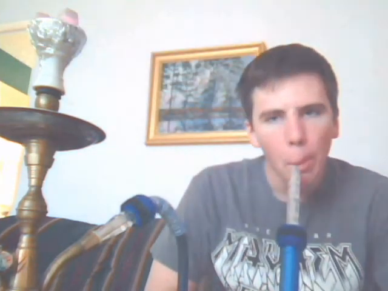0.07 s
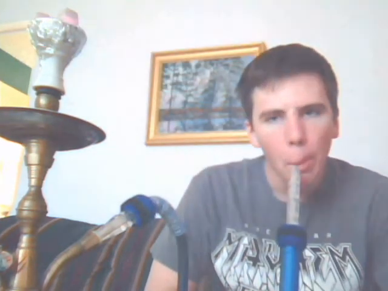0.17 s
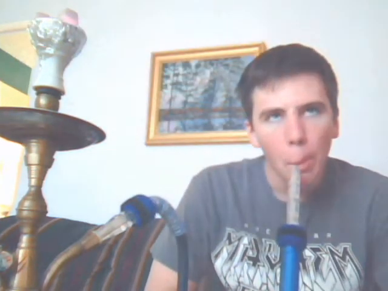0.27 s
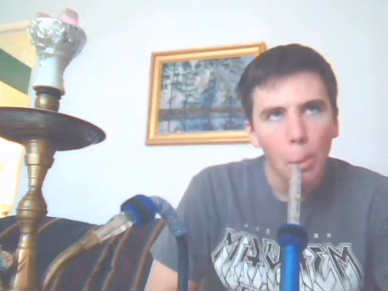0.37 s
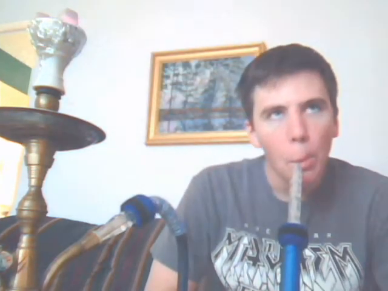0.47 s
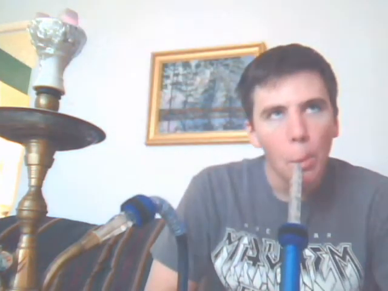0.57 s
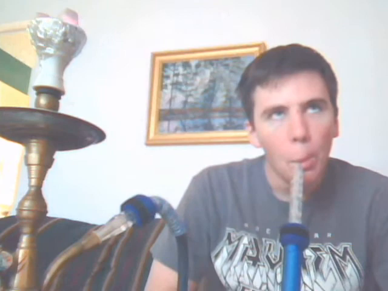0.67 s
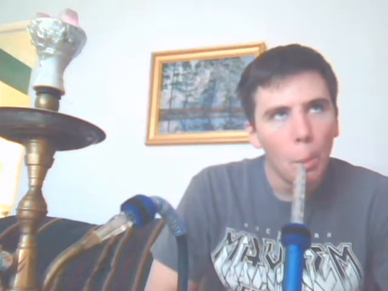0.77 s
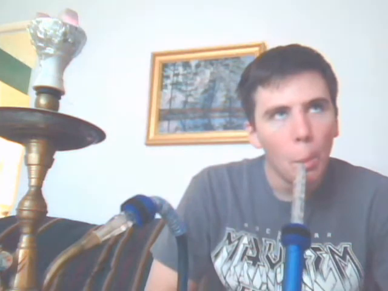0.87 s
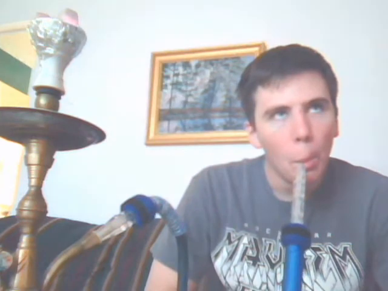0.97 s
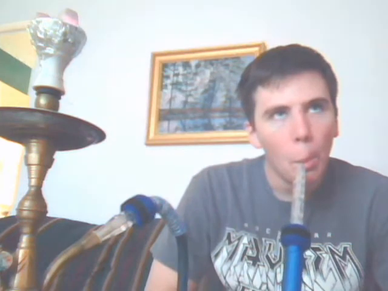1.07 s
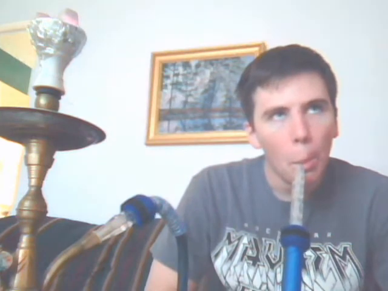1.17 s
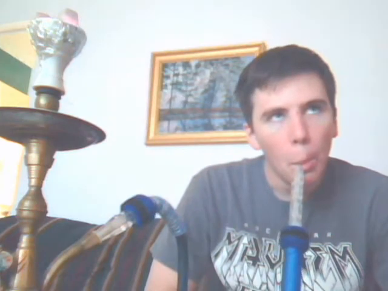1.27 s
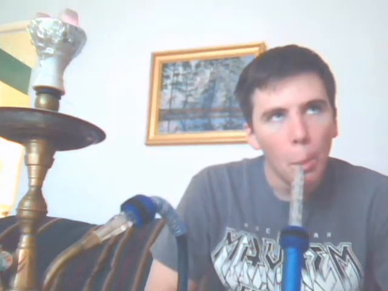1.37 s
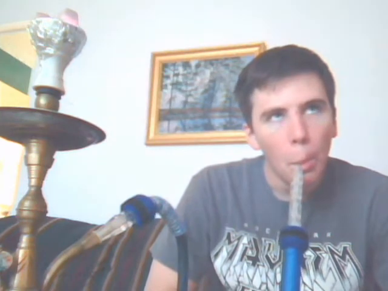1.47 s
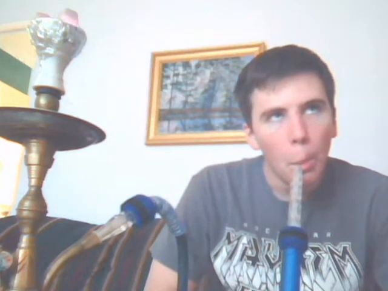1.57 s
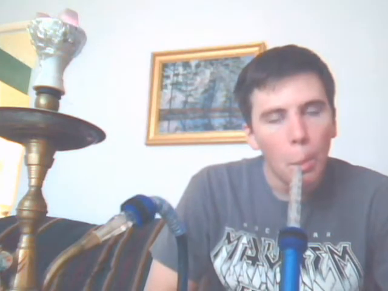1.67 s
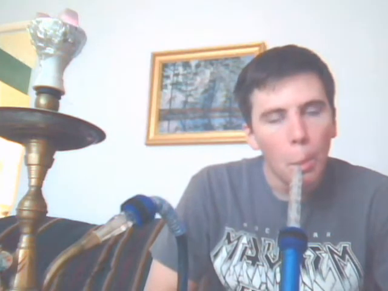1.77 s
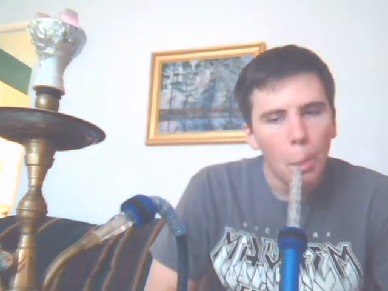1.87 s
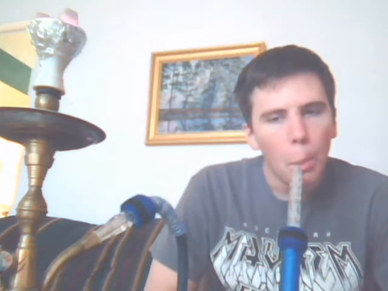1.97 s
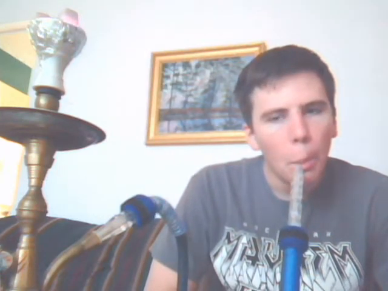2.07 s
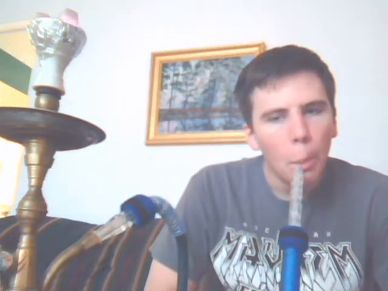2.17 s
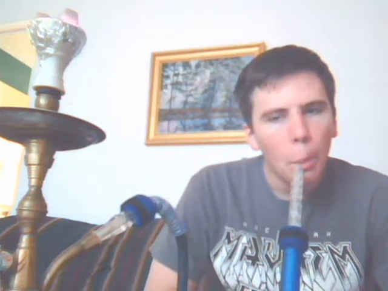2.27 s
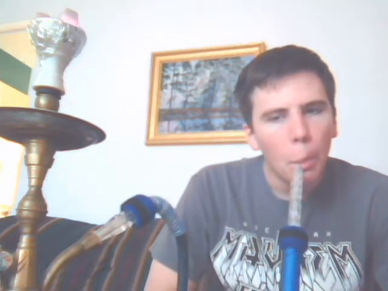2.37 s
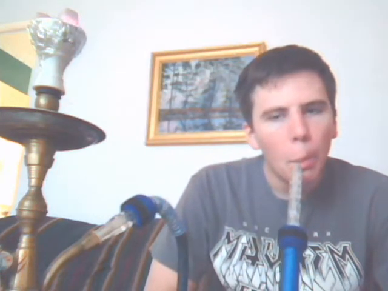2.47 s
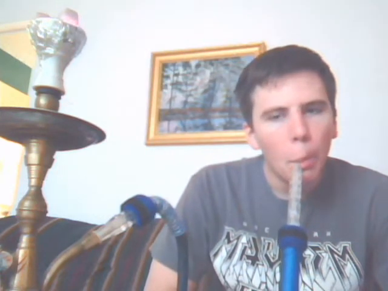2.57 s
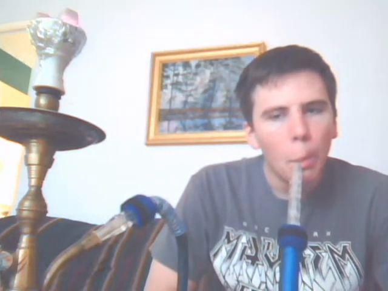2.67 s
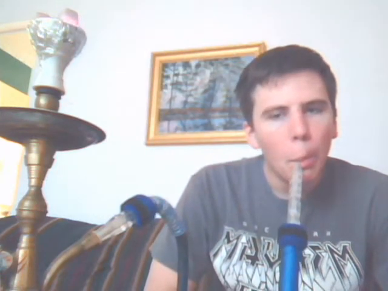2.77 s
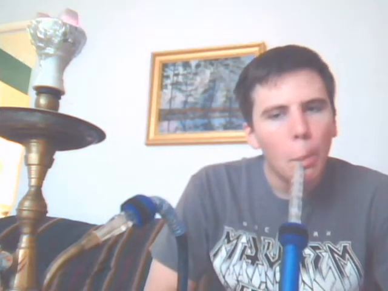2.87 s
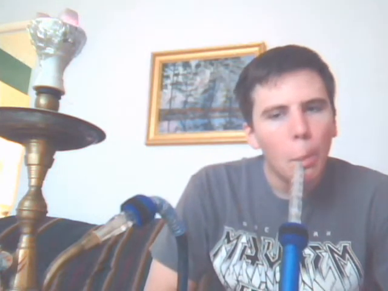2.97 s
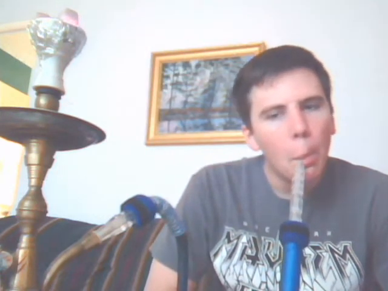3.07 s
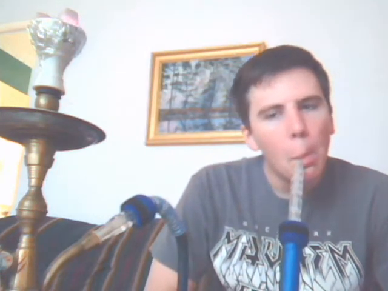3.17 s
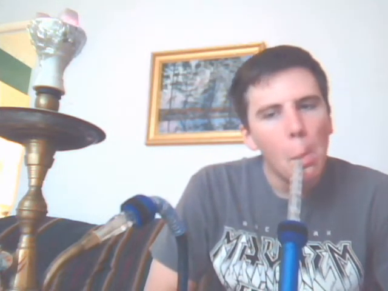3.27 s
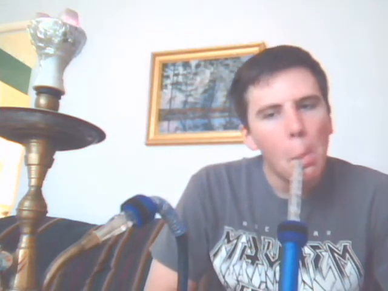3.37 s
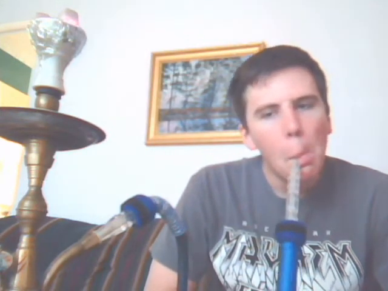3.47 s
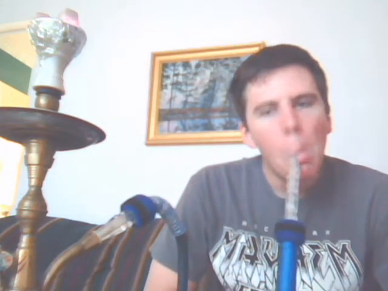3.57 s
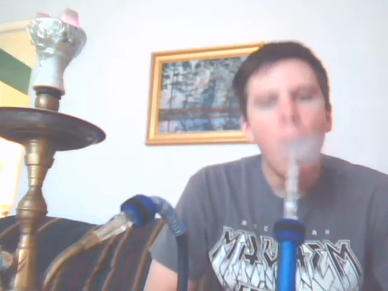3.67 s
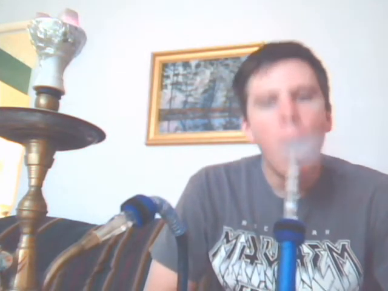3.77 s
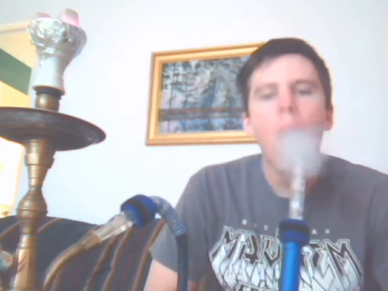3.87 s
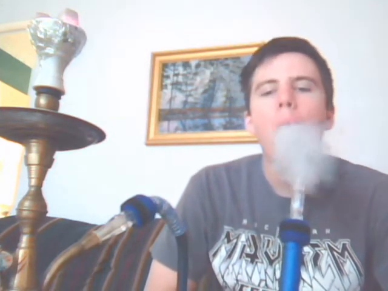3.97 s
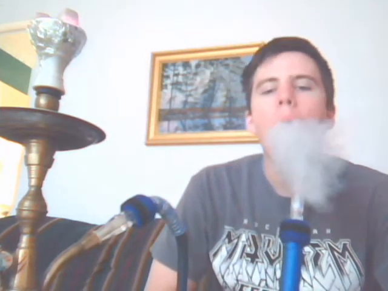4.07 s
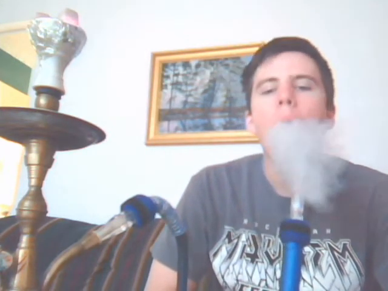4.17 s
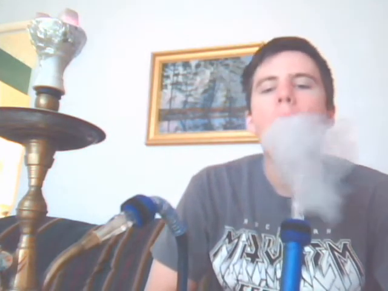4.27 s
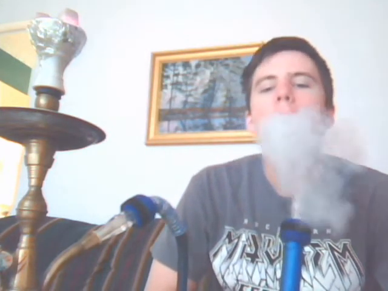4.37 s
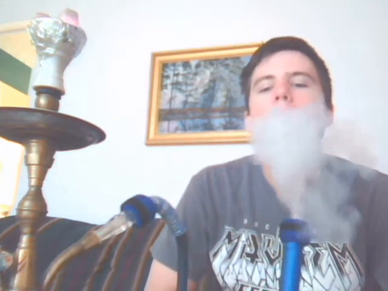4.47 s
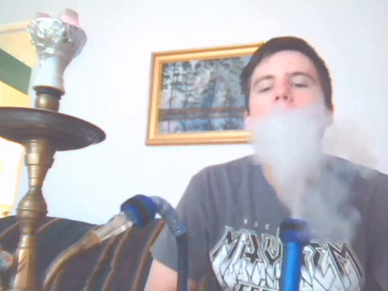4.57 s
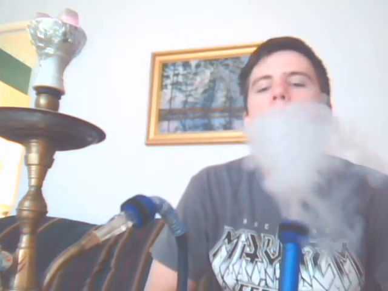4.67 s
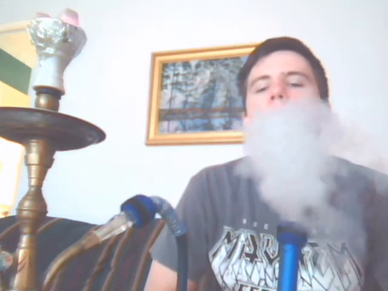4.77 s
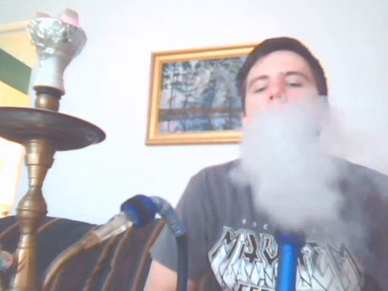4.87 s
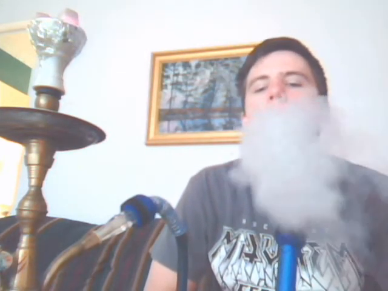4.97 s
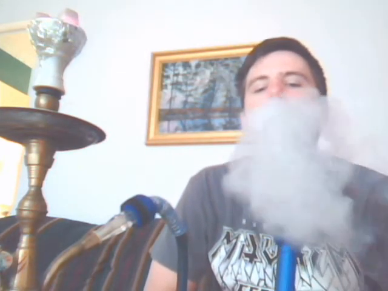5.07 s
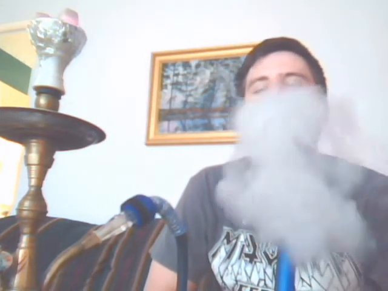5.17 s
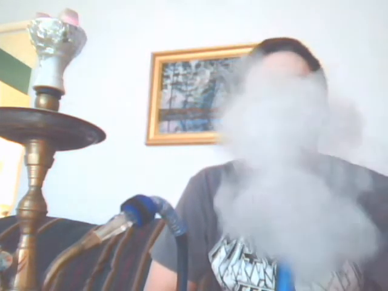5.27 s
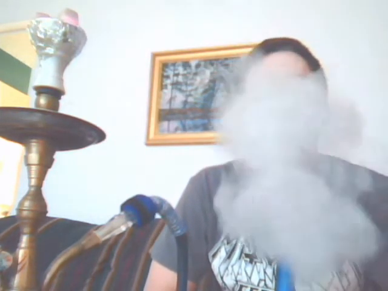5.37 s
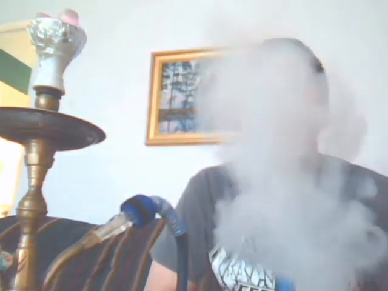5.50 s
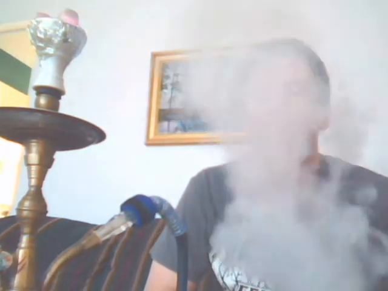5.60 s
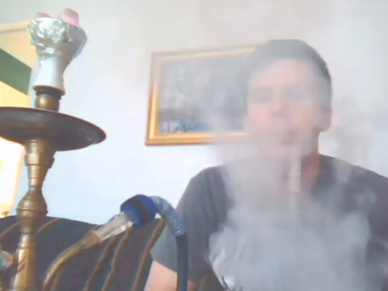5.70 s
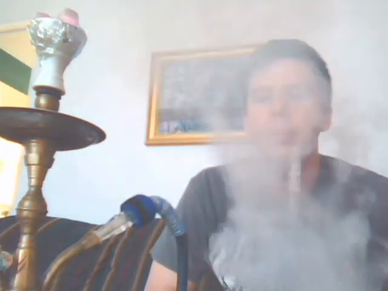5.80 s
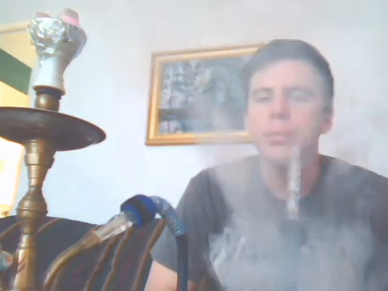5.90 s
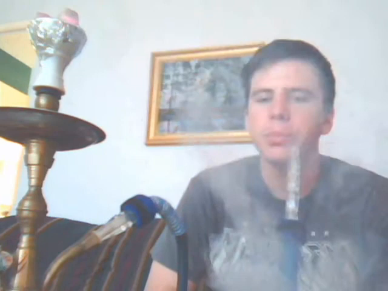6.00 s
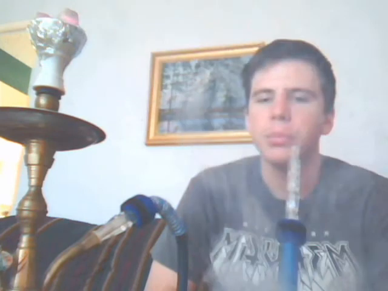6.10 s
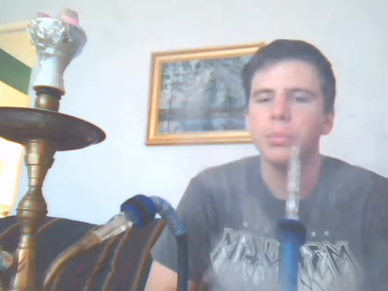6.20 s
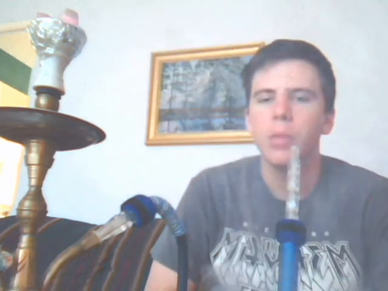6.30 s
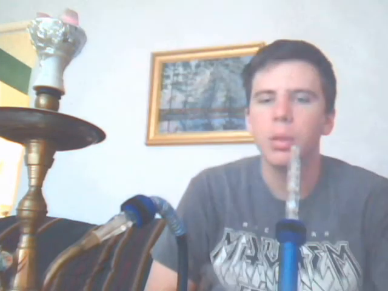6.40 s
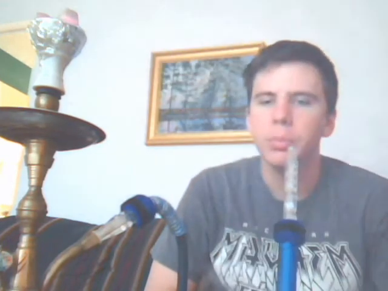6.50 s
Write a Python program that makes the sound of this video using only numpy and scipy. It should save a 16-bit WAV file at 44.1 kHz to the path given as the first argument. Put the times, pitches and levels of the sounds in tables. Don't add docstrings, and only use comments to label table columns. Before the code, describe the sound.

A very brief quiet opening holds only a soft computer fan, low mains hum, thin whines and microphone hiss. At about 0.17 seconds air breaks through the water with a small jolt, and a close, rapid gurgle begins. Deep hollow gulps, low and rounded, overlap with sharp wet snaps and fine fizz, many per second and irregular. The draw is strong at first, dips briefly around 1.3, then continues with a harder table jolt at 1.6. Dull low thuds and scattered glassy drops and metal rattles accompany it, with a bright tick near 3.4. After a last strong pull at 3.5, bubbling dies by 3.75. The small, fairly dry room then holds just fan, hum and hiss, until two or three tiny dry mouthpiece clicks at about 6.4 seconds.

```python
import sys
import numpy as np
from scipy import signal
from scipy.fft import rfft, irfft, next_fast_len
from scipy.io import wavfile

SR = 44100
rng = np.random.default_rng(int(sys.argv[2]) if len(sys.argv) > 2 else 0)


def decibels_to_gain(level_db):
    exponent = np.asarray(level_db, float) / 20
    return 10 ** exponent


def output_pcm(signal):
    pcm = np.clip(np.atleast_2d(signal).T, -1, 1) * 32767
    wavfile.write(sys.argv[1], SR, np.round(pcm).astype(np.int16))


N = 288414

# t/s, level/dB
DRAW = [
    (.17, -6.5),
    (.35, 0.5),
    (1.2, -1),
    (1.34, -5),
    (1.45, -2),
    (2.4, -3),
    (3.5, -0.5),
    (3.62, -3),
    (3.75, -17),
]
# f/Hz, width/Hz, level/dB
BASE_MODES = [
    (221.3, 29, -7),
    (266, 85, -12),
]
# f/Hz, level/dB, t60/s
STEM_MODES = [(508, -2.5, 0.037), (624, -4, 0.091), (746, -12, 0.035), (770, -2.5, 0.032), (1000, 2, 0.027),
              (1130, -13, 0.088), (1416, -13, 0.11), (1400, -8.5, 0.034), (1460, -17.5, 0.031),
              (1740, -16, 0.067), (1900, -12.5, 0.019), (2350, -17.5, 0.014), (2603, -28.5, 0.12),
              (3300, -22, 0.013)]
# t/s, gulp level/dB, gulp f/Hz, snap level/dB, neck f/Hz
DEEP_BUBBLES = [(0.225, -25, 264.4, -33, 670), (.257, -16.5, 249, -26.5, 980), (.38, -17.5, 266, -31, 622),
                (.513, -21.5, 270, -22, 972), (0.641, -22, 258, -42, 700), (0.846, -19.5, 265.6, -25, 1000),
                (.981, -21, 270, -27, 624), (1.153, -25.5, 276, -38, 770), (1.38, -21, 235, -25.5, 624),
                (1.476, -24.5, 260, -40, 603), (1.951, -23, 244, -27, 770), (2.11, -22, 260, -31.5, 1000),
                (2.25, -26.5, 274, -38, 762), (2.439, -21, 240, -20, 624), (2.597, -24.5, 229, -27, 624),
                (2.691, -23.5, 247, -31, 627), (2.732, -23.5, 255.3, -18.5, 650),
                (2.834, -19, 244, -23.5, 1010), (3.096, -22, 266, -28, 1000),
                (3.129, -20, 243, -21.5, 1040), (3.178, -23, 266, -19.5, 791),
                (3.233, -19.5, 238, -25, 780), (3.339, -23, 243, -30.5, 627),
                (3.44, -18, 246.7, -27.5, 930)]
# t/s, snap level/dB, neck f/Hz, gulp level/dB
SHARP_BUBBLES = [(.166, -37, 680, -33.5), (.313, -25.5, 646, -25), (0.339, -25.5, 720, -40),
                 (0.442, -24.5, 780, -30.5), (.566, -30, 590, -30.5), (0.682, -27.5, 1090, -37),
                 (0.753, -36, 990, -26.5), (0.814, -27.5, 726, -27.5), (.903, -30.5, 745, -27.5),
                 (1.074, -23, 1090, -38), (1.263, -28, 666, -31), (1.462, -32, 552, -27),
                 (1.52, -23, 1000, -30.5), (1.587, -31.5, 630, -33), (1.685, -28.5, 960, -43),
                 (1.73, -22, 730, -23), (1.793, -28, 980, -27.5), (1.838, -28, 980, -28.5),
                 (1.995, -20.5, 1000, -27), (2.068, -42, 700, -27.5), (2.218, -33.5, 760, -38),
                 (2.333, -36, 611, -30), (2.385, -26.5, 815, -30), (2.545, -25, 970, -31),
                 (2.892, -25.5, 624, -34), (2.95, -27, 636, -27.5), (3.003, -20, 1000, -36),
                 (3.399, -23.5, 850, -31.5), (3.472, -23.5, 790, -29), (3.566, -26.5, 624, -26.5)]
# t/s, gulp level/dB, gulp f/Hz, snap level/dB
SOFT_BUBBLES = [(.202, -30.5, 257, -32.5), (.352, -27.5, 287, -45), (.58, -29.5, 286, -45),
                (0.697, -21.5, 263, -39), (0.913, -22.5, 270.5, -38), (1.023, -31.5, 253, -36),
                (1.094, -27, 289, -42), (1.2, -31, 282, -32.5), (1.555, -32.5, 289, -43),
                (1.657, -35.5, 278, -52), (1.744, -22.5, 264.6, -43), (1.852, -26, 267, -33),
                (2.153, -31.5, 266, -42), (2.287, -40, 243, -33), (2.507, -33, 284, -31.5),
                (2.662, -30, 264, -34.5), (2.742, -19, 259, -40), (2.808, -26, 231, -30),
                (3.028, -30.5, 234, -52), (3.286, -34, 290, -33), (3.634, -28, 245.5, -48),
                (3.68, -33, 234, -41.5)]


def unit(x):
    return x / np.sqrt(np.mean(x ** 2) + 1e-20)


def curve(rows):
    s, db = np.transpose(rows)
    return np.interp(np.arange(N) / SR, s, db, left=-120, right=-120)


def drift(rate):
    r = np.exp(-80 * np.pi * rate / SR)
    noise = rng.standard_normal(N // 40 + 2002)
    slow = signal.lfilter([1], [1, -2 * r, r * r], noise)[2000:]
    return np.interp(np.arange(N) / 40, np.arange(len(slow)), unit(slow))


def band(x, low_hz, high_hz):
    return signal.sosfilt(signal.butter(2, [low_hz, high_hz], "band", fs=SR, output="sos"), x)


def resonate(x, hz, width_hz):
    r = np.exp(-np.pi * width_hz / SR)
    feedback = [1, -2 * r * np.cos(2 * np.pi * hz / SR), r * r]
    return signal.lfilter(np.array([1, 0, -1]) * (1 - r * r) / 2, feedback, x + 1e-18)


def resonate_twice(x, hz, width_hz, skirt):
    return resonate(resonate(x, hz, width_hz), hz, skirt * width_hz)


def ring(clicks, hz, t60):
    r = decibels_to_gain(-60 / (t60 * SR))
    w = 2 * np.pi * hz / SR
    return signal.lfilter([0, np.sin(w)], [1, -2 * r * np.cos(w), r * r], clicks + 1e-18)


def grains(per_s, spread_db):
    sizes = decibels_to_gain(spread_db * np.minimum(rng.exponential(1, N), 4)) * rng.choice([-1, 1], N)
    return sizes * (rng.random(N) < per_s * decibels_to_gain(2.5 * drift(12)) / SR)


def add(out, s, sound):
    i = int(s * SR)
    out[i:i + len(sound)] += sound[:N - i]


def struck(modes, at, db, tilt_db, scatter_db):
    out = np.zeros(N)
    for (hz, mode_db, t60), luck in zip(modes, rng.standard_normal((len(at), len(modes))).T):
        octaves = max(np.log2(hz / 1000), 0)
        clicks = np.zeros(N)
        clicks[at] = decibels_to_gain(db + mode_db + tilt_db * octaves + scatter_db * luck) * np.sign(luck)
        out += ring(clicks, hz, t60)
    return out


def room_air():
    # f/Hz, density/dB per Hz
    air_spectrum = [
        (25, 4),
        (100, -7.5),
        (300, -1.5),
        (550, -12),
        (1100, -8.5),
        (2000, -16),
        (3500, -19.5),
        (7000, -24),
        (15500, -26.5),
    ]
    hz = np.maximum(np.fft.rfftfreq(N, 1 / SR), 1)
    at, db = np.transpose(air_spectrum)
    shape = decibels_to_gain(np.interp(np.log(hz), np.log(at), db))
    return decibels_to_gain(-53.5) * unit(irfft(rfft(rng.standard_normal(N)) * shape, N))


def hums():
    # f/Hz, level/dB
    hum_tones = [
        (120, -56),
        (1477, -69),
        (2955, -84),
        (3323, -78),
        (3693, -84),
        (12963, -80),
        (15675, -86),
        (15734, -71),
    ]
    t = np.arange(N) / SR
    out = sum(decibels_to_gain(db + 0.21 * drift(11)) * np.sin(2 * np.pi * (hz * t + rng.random())) for hz, db in hum_tones)
    return np.sqrt(2) * out


def case_air():
    # f/Hz, width/Hz, level/dB
    case_modes = [(443.7, 26, -60), (705.4, 87, -54.5), (793, 18, -71), (958.5, 30, -66.5), (1297, 62, -70),
                  (1535, 250, -66), (2160, 47, -70.5), (2572, 28, -76)]
    air = rng.standard_normal(N)
    return sum(decibels_to_gain(db) * unit(resonate_twice(air, hz, w, 2)) for hz, w, db in case_modes)


def fan():
    # multiple of the turning rate, level/dB
    blade_tones = [(2, -61), (3, -66), (4, -72.5), (5, -58), (6, -63.5), (8, -67.5), (9, -62), (10, -62.5),
                   (16, -72.5)]
    fan_hz = 78.94
    turns = fan_hz * np.cumsum(1 + 0.001178 * drift(0.5)) / SR
    out = sum(decibels_to_gain(db + 2.0 * drift(2.4)) * np.sin(2 * np.pi * (k * turns + rng.random())) for k, db in blade_tones)
    return np.sqrt(2) * out


def table_sway():
    # t/s, level/dB
    sway_level = [(0.0, -60), (0.46, -48), (0.82, -34.5), (1.13, -35.5), (1.27, -43.5), (1.71, -32),
                  (2.02, -30), (2.22, -41), (2.5, -26), (2.95, -26.5), (3.37, -28.5), (3.97, -33.5),
                  (4.17, -44), (4.5, -39.5), (5.17, -59), (6.54, -63)]
    sway_hz = 20.7
    return np.sqrt(2) * decibels_to_gain(curve(sway_level)) * np.sin(2 * np.pi * sway_hz * np.arange(N) / SR + 1.22)


def mouthpiece():
    # t/s, peak/dB, low ring f/Hz, high ring level/dB, t60/s
    click_events = [
        (6.368, -42, 4860, -31, 0.021),
        (6.397, -53, 5600, 8, .008),
        (6.414, -34, 3800, 2.5, 0.0051),
    ]
    high_hz, crack_db = 9300, 6
    out, t = np.zeros(N), np.arange(SR // 20) / SR
    for s, db, low_hz, high_db, t60 in click_events:
        low = np.sin(2 * np.pi * low_hz * t)
        high = decibels_to_gain(high_db - 60 * t / 0.012) * np.sin(2 * np.pi * high_hz * t)
        crack = decibels_to_gain(crack_db - 60 * t / 0.0065) * band(rng.standard_normal(len(t)), 2800, 11000)
        attack = 1 - np.exp(-t / 0.00028)
        add(out, s, decibels_to_gain(db - 60 * t / t60) * attack * (low + high + crack))
    return out


def shiver():
    shiver_pitches = [
        4300,
        5750,
        7500,
    ]
    knocks = grains(45, spread_db=2.5)
    dealt = rng.integers(0, len(shiver_pitches), N)
    rings = sum(ring(knocks * (dealt == k), hz, 0.02) for k, hz in enumerate(shiver_pitches))
    return decibels_to_gain(curve(DRAW) - 75) * unit(rings)


def ticks():
    # t/s, peak/dB, f/Hz
    glass_drops = [(.615, -41, 5720), (.686, -47, 7600), (.795, -51, 5400), (.818, -51, 6800),
                   (1.065, -49, 6860), (2.104, -49, 6800), (2.174, -49, 5500), (2.49, -44.5, 5750),
                   (2.499, -40.5, 4170), (2.587, -44.5, 4200), (2.732, -42, 3360), (2.837, -44.5, 7100),
                   (3.059, -47, 5670), (3.127, -52, 7200), (3.364, -35.5, 5700), (3.485, -49, 5750),
                   (3.615, -49, 5500)]
    # t/s, peak/dB, f/Hz
    metal_rattles = [(.325, -52, 3300), (.352, -47, 3310), (.592, -51, 9600), (.618, -46, 7500),
                     (.618, -48, 6160), (.618, -49, 4300), (.673, -53, 4200), (1.015, -46, 3380),
                     (1.149, -55, 7500), (1.694, -53, 7500), (1.759, -50, 3320), (2.01, -53, 7500),
                     (2.342, -49.5, 7530), (2.692, -41.5, 7500), (2.798, -46, 3500), (3.51, -56, 7300)]
    # f/Hz, level/dB, t60/s
    tray_modes = [
        (4300, -6.5, 0.16),
        (5800, 9, 0.022),
        (6360, -1.5, 0.11),
        (7500, -9, 0.087),
        (9450, -7, 0.042),
    ]
    drop_t60_s, rattle_t60_s = 0.018, .05
    chime_db, crack_db, crack_s = -18.5, -3, 0.011
    rows = [(*row, drop_t60_s) for row in glass_drops] + [(*row, rattle_t60_s) for row in metal_rattles]
    s, db, hz, t60 = np.transpose(rows)
    out = struck(tray_modes, (s * SR).astype(int), db + chime_db, 0, scatter_db=1.5)
    t = np.arange(SR // 10) / SR
    attack = 1 - np.exp(-t / 0.00054)
    for (s, db, hz, t60), noise in zip(rows, rng.standard_normal((len(s), len(t)))):
        add(out, s, decibels_to_gain(db - 60 * t / max(t60, .004)) * attack * np.sin(2 * np.pi * hz * t))
        add(out, s, decibels_to_gain(db + crack_db - 60 * t / crack_s) * unit(band(noise, 0.75 * hz, 1.22 * hz)))
    return out


def jolts():
    # t/s, peak/dB, length/s
    jolt_events = [
        (.174, -24, 0.0018),
        (1.377, -37, 0.007),
        (1.492, -29, 0.011),
        (1.549, -28, 0.01),
        (1.601, -14.5, 0.0044),
        (1.644, -30, 0.0065),
        (2.97, -40, 0.013),
        (3.453, -24, 0.012),
    ]
    out = np.zeros(N)
    for s, db, length in jolt_events:
        add(out, s - length / 2, -decibels_to_gain(db) * np.hanning(int(length * SR)))
    return signal.sosfilt(signal.butter(2, 35, "high", fs=SR, output="sos"), out)


def thuds():
    # f/Hz, width/Hz, level/dB
    table_modes = [
        (43.8, 13, -2.5),
        (68, 19, -6),
        (111.4, 27, -2),
        (154.2, 9.8, -7),
        (357.6, 8.5, -15.5),
    ]
    # t/s, level/dB
    shake_level = [
        (.17, -9),
        (.45, 0),
        (1.0, -3.5),
        (1.3, 0),
        (1.85, 3),
        (2.15, -5.5),
        (2.95, 2),
        (3.25, -6),
        (3.7, -4.5),
    ]
    push = grains(200, spread_db=2.0) * decibels_to_gain(1.2 * drift(2.3))
    boom = sum(decibels_to_gain(db) * unit(resonate_twice(push, hz, w, 3)) for hz, w, db in table_modes)
    return decibels_to_gain(curve(shake_level) - 42) * unit(boom)


def fizz():
    fine = grains(500, spread_db=5.0)
    dealt = rng.integers(0, len(STEM_MODES), N)
    rings = sum(decibels_to_gain(db) * ring(fine * (dealt == k), hz, 0.31 * t60) for k, (hz, db, t60) in enumerate(STEM_MODES))
    return decibels_to_gain(curve(DRAW)) * decibels_to_gain(-50.5) * unit(rings)


def gurgle():
    small = grains(160, spread_db=3.5)
    hollow = sum(decibels_to_gain(db) * resonate_twice(small, hz, w, 3) * (-1) ** k for k, (hz, w, db) in enumerate(BASE_MODES))
    return decibels_to_gain(curve(DRAW)) * decibels_to_gain(-36.5) * unit(hollow)


def room(x):
    t60_s = .2
    size = next_fast_len(N + SR)
    w = 2 * np.pi * np.fft.rfftfreq(size)
    echo = 0
    for delay in rng.uniform(.008, .03, 10):
        loop = decibels_to_gain(-60 * delay / t60_s) * np.exp(-1j * w * round(delay * SR))
        echo = echo + 1 / (1 - loop) - 1
    return irfft(rfft(x, size) * echo, size)[:N] / 3


def snaps():
    soft_neck_hz = 670
    stem_db, spray_db, spray_s = -15, -4, .02
    bright_db, bright_spread_db, brighter_per_db = -2.5, 3, 0.07
    pop_db, pop_hz, pop_s = -3.0, 850, 0.00072
    neck_db, neck_cycles = -7, 20.4
    splash_db, splash_t60_s = -20.5, 0.077
    rows = [row[:3] for row in SHARP_BUBBLES]
    rows += [(row[0], *row[3:]) for row in DEEP_BUBBLES]
    rows += [(row[0], row[3], soft_neck_hz) for row in SOFT_BUBBLES]
    s, db, pitch = np.transpose(rows)
    tilt_db = bright_db + brighter_per_db * (db - db.mean()) + bright_spread_db * rng.standard_normal(len(s))
    out = struck(STEM_MODES, (s * SR).astype(int), db + stem_db, tilt_db, scatter_db=3.0)
    for late in rng.exponential(1, (len(s), 6)).T:
        at = ((s + 0.003037 + spray_s * late / 2) * SR).astype(int)
        out += struck(STEM_MODES, at, db + stem_db + spray_db - 5 * late, tilt_db, scatter_db=3.5)
    t = np.arange(SR // 20) / SR
    neck_attack, splash_attack = 1 - np.exp(-t / 0.0019), 1 - np.exp(-t / 0.0036)
    pop_shape = np.exp(-(t / pop_s - 1.2) ** 2)
    sizes = decibels_to_gain(0.42 * rng.standard_normal((len(s), 1)))
    for s, db, hz, size in zip(s, db, pitch, sizes):
        add(out, s, decibels_to_gain(db + neck_db - 60 * t * hz / neck_cycles) * neck_attack * np.sin(2 * np.pi * hz * t))
        add(out, s, decibels_to_gain(db + pop_db) * pop_shape * np.sin(2 * np.pi * pop_hz * size * t))
        wet = band(rng.standard_normal(len(t)), 640, 2300)
        add(out, s, decibels_to_gain(db + splash_db - 60 * t / splash_t60_s) * splash_attack * unit(wet))
    return signal.sosfilt(signal.butter(2, 3600, fs=SR, output="sos"), out)


def gulps():
    lag_s, lead_s = 0.00646, 0.00787
    swell_s, t60_s, rise = 0.0078, 0.061, -0.19
    lobe_gap_s, lobe_loss_db = .032, 9.5
    sharp_hz, sharp_spread_hz = 260, 20
    rows = [row[:3] for row in DEEP_BUBBLES + SOFT_BUBBLES]
    for (s, _, _, db), luck in zip(SHARP_BUBBLES, rng.standard_normal(len(SHARP_BUBBLES))):
        rows.append((s, db, sharp_hz + sharp_spread_hz * luck))
    out, t = np.zeros(N), np.arange(SR // 4) / SR
    shape = (1 - np.exp(-t / swell_s)) ** 3 * decibels_to_gain(-60 * t / t60_s)
    shape = shape / shape.max()
    for (s, db, hz), turns in zip(rows, rng.random((len(rows), 3))):
        for k, turn in enumerate(turns):
            tone = np.sin(2 * np.pi * (hz * t * (1 + rise * t) + turn))
            add(out, s + lag_s + k * lobe_gap_s - lead_s, decibels_to_gain(db - k * lobe_loss_db) * shape * tone)
    return out + sum(decibels_to_gain(db - 6) * resonate(out, hz, w) for hz, w, db in BASE_MODES)


def scene():
    background = room_air() + hums() + case_air() + fan()
    table = table_sway() + jolts() + thuds()
    metal = decibels_to_gain(-2.0) * ticks() + shiver() + mouthpiece()
    snap = snaps()
    water = gulps() + gurgle() + fizz() + snap + decibels_to_gain(-9) * room(snap)
    return (background + table + metal + water)[None]


def low_pass(x):
    return signal.sosfilt(signal.butter(12, 15750, fs=SR, output="sos"), x)


def record(dry):
    return low_pass(dry + .0004)


dry = scene()
out = record(dry)
output_pcm(out)
```